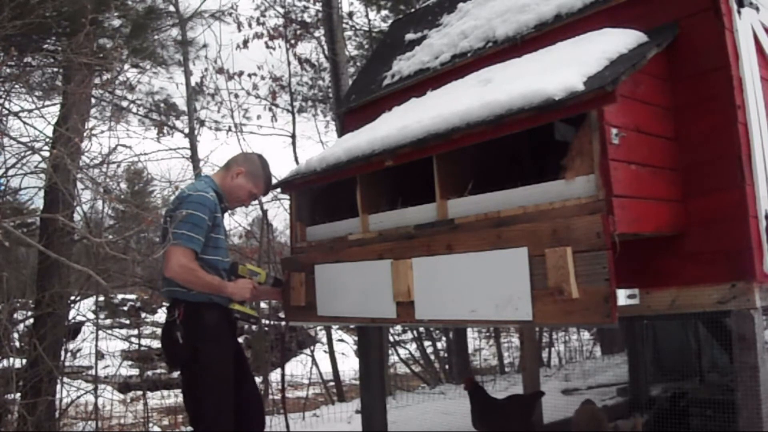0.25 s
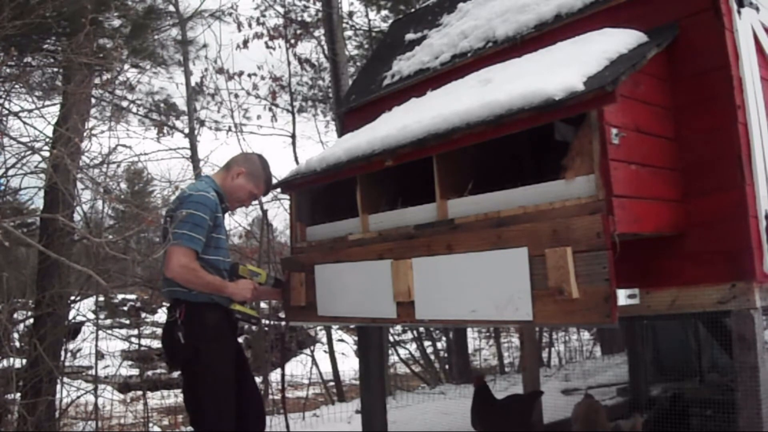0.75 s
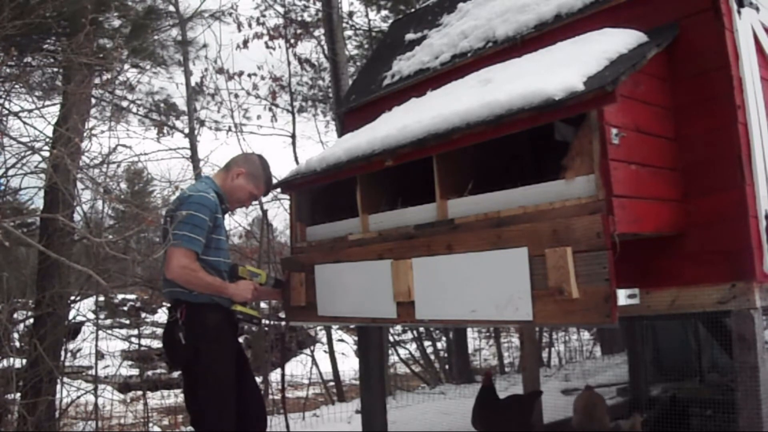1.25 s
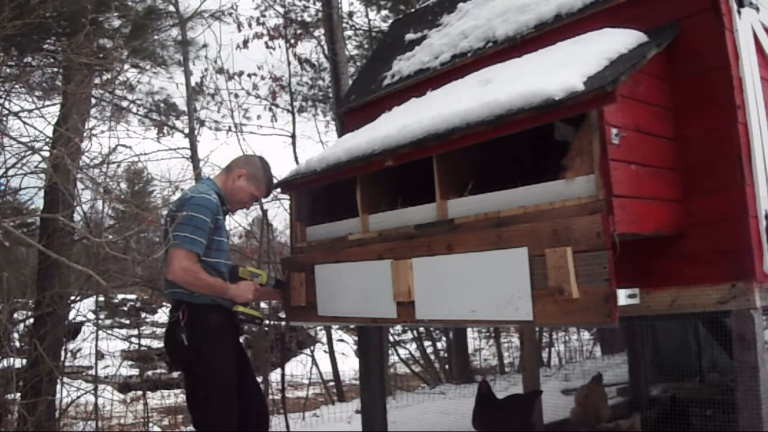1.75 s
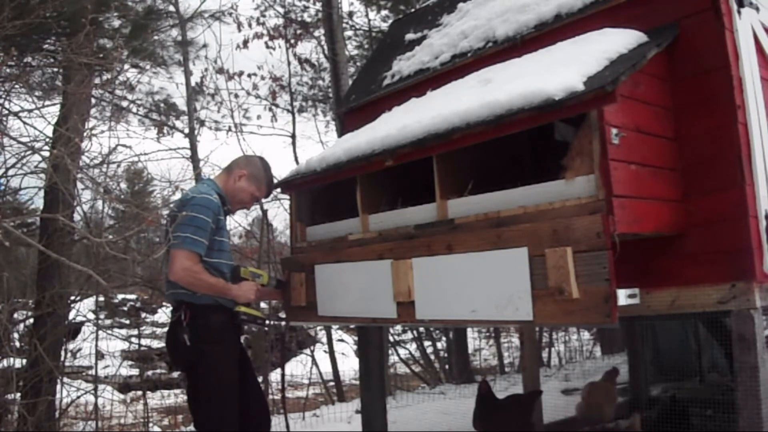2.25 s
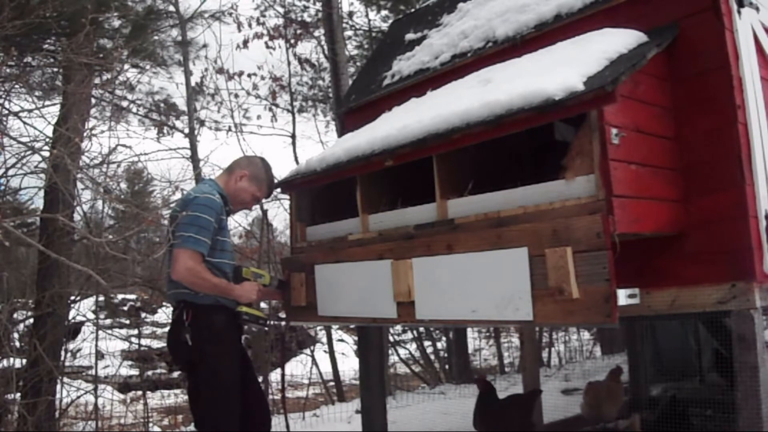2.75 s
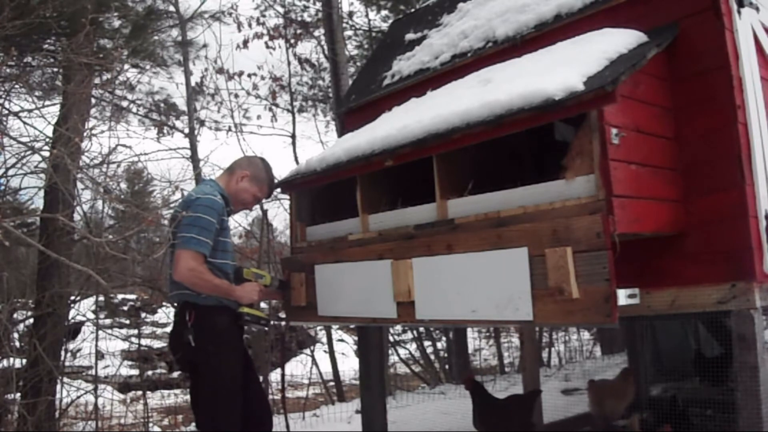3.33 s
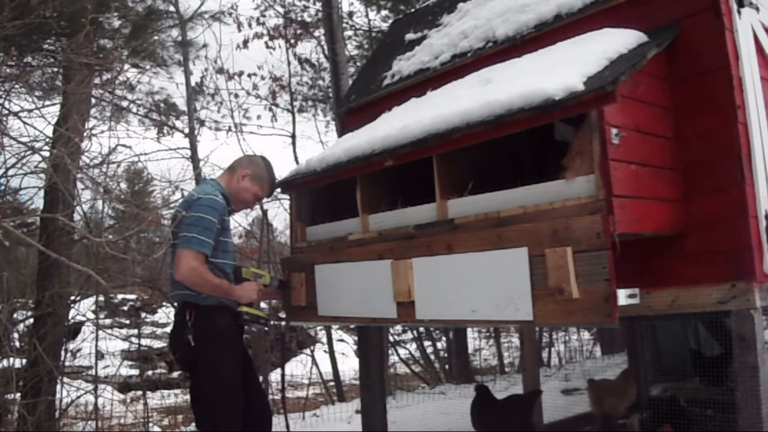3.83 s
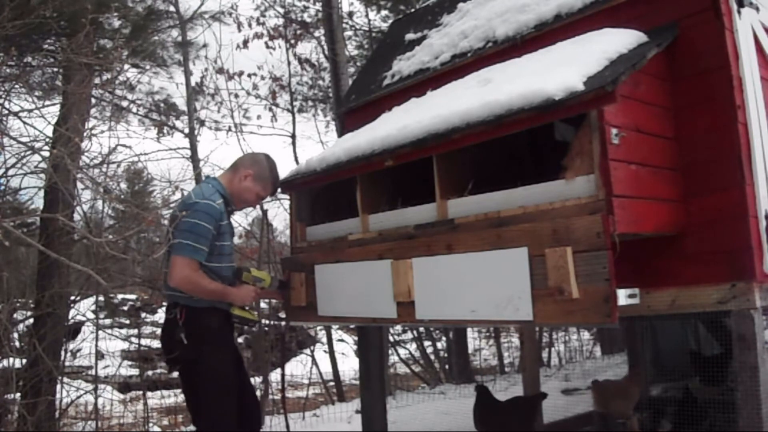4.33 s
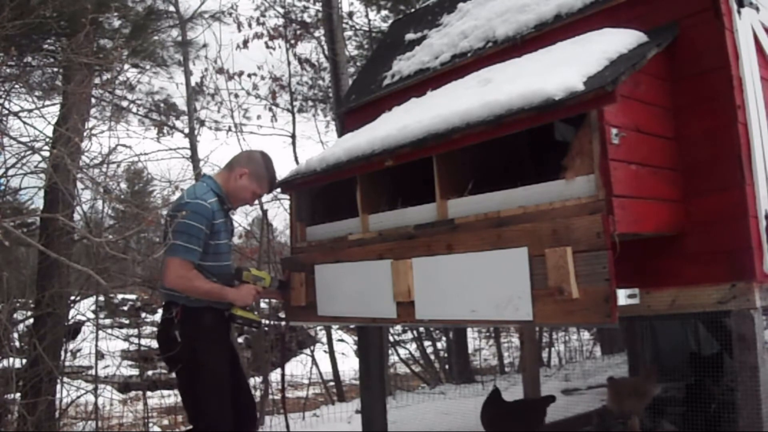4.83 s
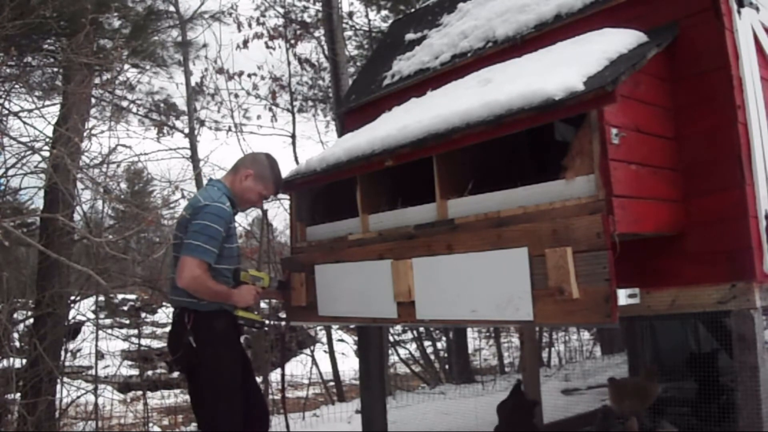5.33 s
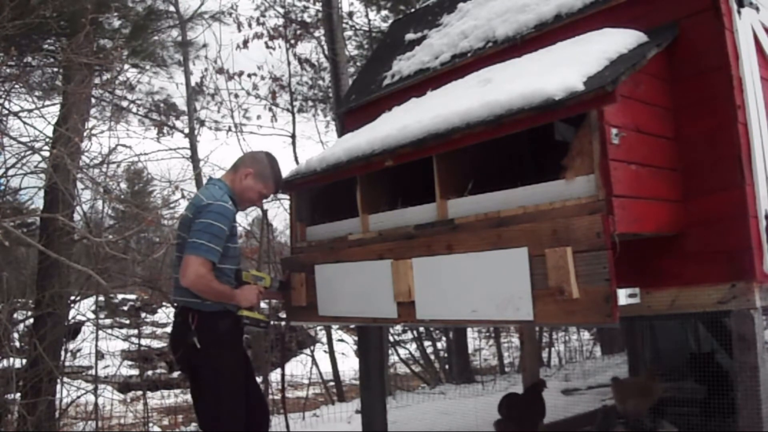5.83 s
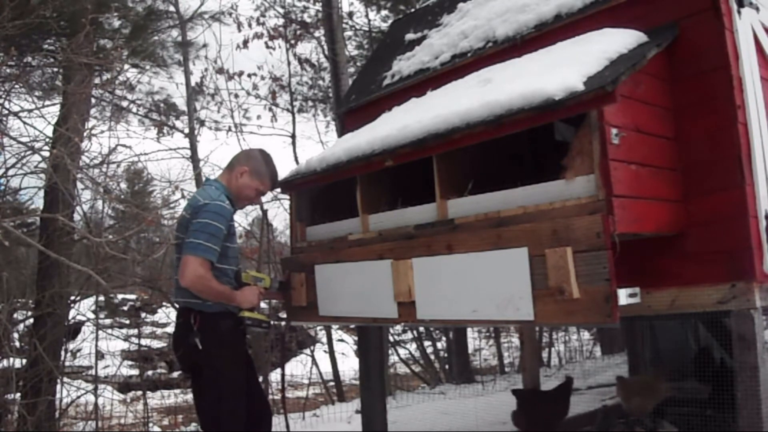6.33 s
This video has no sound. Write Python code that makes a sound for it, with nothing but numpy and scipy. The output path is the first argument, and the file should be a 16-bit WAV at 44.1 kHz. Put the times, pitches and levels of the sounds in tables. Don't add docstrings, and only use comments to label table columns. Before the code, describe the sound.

A cordless drill whirs in short rising squeezes, then a longer pull, with sharp clacks echoing off wooden boards in a quiet snowy yard.

```python
import sys
import numpy as np
from scipy import signal
from scipy.io import wavfile
from scipy.ndimage import uniform_filter1d

SR = 44100
rng = np.random.default_rng(int(sys.argv[2]) if len(sys.argv) > 2 else 0)


def gain_from_db(level_db):
    decades = np.asarray(level_db, float) / 20
    return 10 ** decades


def master(y):
    cut = np.clip(np.atleast_2d(y).T, -1, 1)
    pcm = np.round(cut * 32767)
    wavfile.write(sys.argv[1], SR, pcm.astype(np.int16))


N = 289516

# f/Hz, width/Hz, level/dB
HOUSING = [(1845, 250, -14.5), (2310, 197, -6.5), (2765, 252, 0), (3014, 536, -4), (3045, 240, -6),
           (3903, 550, -7), (4172, 380, -8), (4530, 720, -10), (5300, 330, -11), (5820, 245, -17.5)]
# f/Hz, width/Hz, level/dB
FIZZ = [(6820, 420, -2.5), (7270, 3600, 2.5), (8790, 230, -15.5), (9850, 2240, 6.5), (10700, 1300, -8),
        (11900, 1100, 2), (13400, 420, -29)]
# f/Hz, width/Hz, level/dB
BOARDS = [(384, 480, -9), (798, 147, 1.5), (1180, 310, -3), (1716, 260, -1), (2020, 500, -1)]
LOCK_HZ = 2735


def evened(x):
    return x / np.sqrt(np.mean(x ** 2) + 1e-20)


def add(mix, s, sound):
    part = mix[round(s * SR):][:len(sound)]
    part += sound[:len(part)]


def causal(gain):
    log_gain = np.log(np.concatenate([gain, gain[-2:0:-1]]) + 1e-5)
    taps = np.fft.ifft(np.exp(np.conj(signal.hilbert(log_gain)))).real[:1024]
    return taps / np.linalg.norm(taps)


def passed_power(hz, modes):
    return sum((gain_from_db(db) / (1 + (2 * (hz - f) / w) ** 2)) ** 2 for f, w, db in modes)


def passed_db(hz, modes):
    return 10 * np.log10(passed_power(hz, modes))


def through(x, modes):
    hz = np.fft.rfftfreq(4096, 1 / SR)
    taps = causal(np.sqrt(passed_power(hz, modes)))
    return signal.oaconvolve(x, taps)[:len(x)]


def flutter(length):
    return evened(uniform_filter1d(rng.standard_normal(length), size=500))


def yard():
    # f/Hz, level/dB per Hz
    air_spectrum = [(12, -38), (20, 18.5), (53, -5), (150, -3.5), (193, -3.5), (434, -7.5), (574, -8.5),
                    (1530, -14.5), (1960, -15.5), (2820, -14.5), (7110, -22), (10500, -18.5),
                    (11400, -17.5), (12400, -22), (16000, -29)]
    # t/s, level/dB
    rumble_swell = [(0.0, 1.5), (6.56, -2)]
    frames, hz = N // 256 + 5, np.fft.rfftfreq(1024, 1 / SR)
    real, imag, patches = rng.standard_normal((frames, 513, 3)).T
    patches = evened(uniform_filter1d(uniform_filter1d(patches, 12, 0), 14, 1))
    f, db = np.transpose(air_spectrum)
    air_db = np.interp(np.log(hz + 1), np.log(f + 1), db)[:, None]
    swell_db = np.interp(np.arange(frames) * 256 / SR, *np.transpose(rumble_swell))
    swell_db = swell_db / (1 + (hz[:, None] / 1500) ** 2)
    z = (real + 1j * imag) * gain_from_db(air_db + 1.36 * patches + swell_db)
    return gain_from_db(-45) * evened(signal.istft(z, nperseg=1024, noverlap=768)[1][:N])


def camera():
    # f/Hz, width/Hz, level/dB
    servo_case = [(3700, 720, 2.5), (4920, 220, 3.5), (7220, 310, 3), (9230, 640, 0.5), (12400, 720, -1)]
    # f/Hz, width/Hz, level/dB
    hiss_bands = [(7870, 270, -59.5), (2730, 190, -93), (15200, 3600, -68)]
    scan_levels = [-26, -15, 0, -17]
    servo_start, servo_length = 0.653, 0.393
    scan_hz, field_hz, steps_per_s = 15734, 60, 58.1
    t = np.arange(N) / SR
    on = 1. * ((t - servo_start) % 1 < servo_length) * (t > servo_start)
    on = uniform_filter1d(on, 800)
    puffs = 0.32 + np.exp(-(t * steps_per_s % 1) / 0.26)
    out = gain_from_db(-47) * on * puffs * through(rng.standard_normal(N), servo_case)
    for hz, width, db in hiss_bands:
        out += gain_from_db(db) * through(rng.standard_normal(N), [(hz, width, 0)])
    for k, db in enumerate(scan_levels):
        out += gain_from_db(db - 57) * np.sin(2 * np.pi * (scan_hz + field_hz * (k - 2)) * t)
    return out


def whine():
    # t/s, level/dB
    whine_levels = [(0.0, -47), (0.55, -46.5), (0.69, -62), (0.8, -44), (1.24, -52.5), (2.56, -54),
                    (2.92, -53), (3.34, -53), (3.69, -48.5), (4.07, -68), (4.25, -48), (4.66, -55),
                    (4.82, -46), (5.11, -61), (5.44, -50), (5.68, -57), (6.12, -64), (6.56, -53)]
    t = np.arange(N) / SR
    gain = gain_from_db(np.interp(t, *np.transpose(whine_levels)))
    return gain * np.sqrt(2) * np.sin(2 * np.pi * 11719 * t)


def whistle(s, length, db, hz, end_hz):
    u = np.linspace(0, 1, round(length * SR))
    tone = np.sin(2 * np.pi * np.cumsum(hz + (end_hz - hz) * u) / SR)
    return s, gain_from_db(db) * np.sqrt(2) * tone * np.sin(np.pi * u) ** 0.89


def clacks():
    # t/s, peak level/dB, board thump/dB, bright crack/dB, contact time/s
    clack_list = [(2.3894, -7.5, -46, 3.5, 0.0012), (3.2945, -38.5, -18, 4, 0.0057),
                  (3.89, -34, -21, -18, 0.0046), (4.118, -50, -18, 15.5, 0.0033),
                  (4.4904, -31.5, -18, -14, 0.00285), (5.245, -24, -31, -5, 0.002),
                  (5.25, -23, -26, -7, .002), (5.27, -28, -23, -19, 0.0026),
                  (5.2756, -6.5, -19.5, -10, 0.00098), (5.5918, -5.5, -7, -27, 0.0032),
                  (5.5956, -4, -8.5, -6.5, 0.0019), (5.6262, -12.5, -20, 3, 0.00043),
                  (6.2118, -22, -11.5, -26, 0.0024), (6.3875, -5, -7.5, -10, 0.0037),
                  (6.3905, -6.5, -8.5, -2.5, 0.0024), (6.5135, -41, -6, 9, 0.0023)]
    clack_t60, echo_db, echo_t60 = 0.0029, -9.5, 0.11
    t, out = np.arange(6000) / SR, np.zeros(N)
    for s, db, thump_db, crack_db, contact in clack_list:
        shape = np.clip(t / (.5 * contact), 0, 1)
        shape = shape * gain_from_db(-60 * np.maximum(t - contact, 0) / clack_t60)
        shape = shape + gain_from_db(echo_db - 60 * t / echo_t60) * (t > contact)
        rings = [through(shape * rng.standard_normal(len(t)), modes) for modes in (HOUSING, BOARDS, FIZZ)]
        knock, thump, crack = [ring / abs(ring).max() for ring in rings]
        add(out, s, gain_from_db(db) * (knock + gain_from_db(thump_db) * thump + gain_from_db(crack_db) * crack))
    return out


def motor_hz(t, squeeze, release, top_hz, coast):
    stall_hz, spin_up_s, crawl_hz = 600, .064, 330
    spin = top_hz - (top_hz - stall_hz) * np.exp(-(np.minimum(t, release) - squeeze) / spin_up_s)
    spin = np.maximum(spin - coast * np.maximum(t - release, 0), 0)
    return uniform_filter1d(np.hypot(spin, crawl_hz), size=700)


def motor_tones(t, hz, release, grip_db, bite_db):
    # f/Hz, width/Hz, level/dB
    gear_case = [(2765, 330, 0), (2370, 320, -9)]
    # f/Hz, width/Hz, level/dB
    vents = [(3800, 1600, 0)]
    tone_levels = [-30, -27, -35.5]
    speed_slopes = [32, 26, 0]
    speed = np.log10(hz / LOCK_HZ)
    tone_hz = np.minimum(hz, LOCK_HZ), 1.073 * hz, 2 * hz
    rings, bites = (gear_case, gear_case, vents), (bite_db, 0, bite_db)
    tone_db = [db + passed_db(f, modes) + slope * speed + grip_db + bite
               for db, f, modes, slope, bite in zip(tone_levels, tone_hz, rings, speed_slopes, bites)]
    coasting_db = -30 + 1.6 * passed_db(2 * hz, HOUSING) + grip_db + bite_db
    tone_db[2] = uniform_filter1d(np.where(t > release, coasting_db, tone_db[2]), size=700)
    lost_hz = np.maximum.accumulate(hz) - hz
    tone_db[:2] = [db - .008 * lost_hz for db in tone_db[:2]]
    out = np.zeros(len(t))
    for f, db in zip(tone_hz, tone_db):
        phase = 2 * np.pi * np.cumsum(f) / SR + .4 * flutter(len(t))
        out += gain_from_db(db + .5 + 2.8 * flutter(len(t))) * np.sqrt(2) * np.cos(phase)
    return out


def gear_overtones(phase):
    multiples = [3, 3.22, 4, 4.44, 5, 6, 7]
    strengths = [-3, -13, -2, -9, -3, -5, -7]
    out = np.zeros(len(phase))
    for k, db in zip(multiples, strengths):
        gain = gain_from_db(-13.5 + db + 2.5 * flutter(len(phase)))
        out += gain * np.cos(k * phase + .45 * flutter(len(phase)))
    return out


def tooth_rattle(t, hz, start, kick, jolt):
    phase = 2 * np.pi * np.cumsum(hz) / SR
    overtones = gear_overtones(phase)
    beat = 1 + 0.05 * np.cos(phase / 10)
    rattle = beat * gain_from_db(1.1 * flutter(len(t))) * rng.standard_normal((3, len(t)))
    slow_db = 5 * np.clip((1050 - hz) / 150, -1, np.sign(t - start - .2))
    low = through(rattle[0] + gain_from_db(slow_db - 6) * through(overtones, HOUSING), HOUSING)
    high = through(rattle[1] + gain_from_db(-4) * np.clip(hz / 2700, 0, 1) ** 4 * overtones, FIZZ)
    boards = (gain_from_db(-26) + gain_from_db(-5.5) * jolt) * through(rattle[2], BOARDS)
    return (kick + jolt) * low + gain_from_db(-6) * (1 + 0.36 * jolt) * high + boards


def spurt(pull, load):
    # t/s, jolt level/dB, drop of rattle/dB, drop of tones/dB
    slips = [
        (2.392, -35, -5, -4),
        (5.592, -17, -6, -20),
        (6.386, -23.5, -3, -24),
    ]
    attack_s, attack_db, kick_s, regrip_s = .022, -11, .045, 0.3
    stop_db_per_s, jolt_db_per_s, speed_db = 422, 328, 24
    start, release = pull[:2]
    stop, rattle_db, kick_db, bite_db = load
    t = np.arange(start, stop + .12, 1 / SR)
    hz = motor_hz(t, *pull)
    gate_db = attack_db * np.clip(1 - (t - start) / attack_s, 0, 1)
    gate_db = gate_db - stop_db_per_s * np.maximum(t - stop, 0)
    level_db = rattle_db + speed_db * np.log10(hz / LOCK_HZ) + gate_db
    for s, _, rattle_drop_db, _ in slips:
        level_db = level_db + rattle_drop_db * (t > s) * np.exp(-abs(t - s) / regrip_s)
    kick = gain_from_db(kick_db * np.exp(-(t - start) / kick_s))
    jolt = sum((t > s) * gain_from_db(db - jolt_db_per_s * abs(t - s) - level_db) for s, db, *_ in slips)
    grip_db = 2 * gate_db + 40 * np.log10(np.minimum(kick, 1))
    grip_db = grip_db + sum((t > s) * (s > start) * drop_db for s, *_, drop_db in slips)
    tones = motor_tones(t, hz, release, grip_db, bite_db)
    rattle = gain_from_db(level_db - 4.5) * tooth_rattle(t, hz, start, kick, jolt)
    return start, (rattle + tones) * signal.windows.tukey(len(t), .06)


def scene():
    # t/s, length/s, level/dB, start f/Hz, end f/Hz
    whistles = [(0.069, 0.053, -50, 5310, 5260), (0.419, 0.044, -43.5, 5330, 5000),
                (0.73, 0.031, -42.5, 5330, 5050), (1.049, 0.029, -43, 5330, 5000),
                (1.341, 0.031, -42, 5330, 5000), (1.712, 0.031, -41.5, 5300, 4960),
                (2.129, 0.036, -43.5, 5300, 4970), (6.19, 0.022, -53, 5300, 5520)]
    # squeeze t/s, release t/s, motor tone headed for f/Hz, coasting loss/Hz per s
    pulls = [(.09, .2, 3150, 4600), (.44, .555, 3140, 3000), (.745, .89, 3040, 6000),
             (1.065, 1.21, 2980, 7000), (1.35, 1.54, 2860, 6500), (1.73, 1.93, 2800, 6800),
             (2.145, 2.8, 2765, 6400), (5.232, 5.42, 2900, 1250), (6.195, 6.33, 2380, 400)]
    # stop t/s, rattle/dB, starting kick/dB, bite of motor tones/dB
    loads = [(.255, -27, -4, -18), (.598, -26, 1.5, -20), (.94, -25, 1.5, -18), (1.268, -24.5, 3, -11),
             (1.595, -23.5, 3, -2.5), (2.04, -23, 7.5, 0.5), (3.2, -23.5, 11, 0.5),
             (5.665, -24.5, -20, 0.5), (6.345, -23, 5, 5.5)]
    mix = yard() + camera() + clacks()
    for row in whistles:
        add(mix, *whistle(*row))
    for pull, load in zip(pulls, loads):
        add(mix, *spurt(pull, load))
    return np.array([mix, mix])


def band_limit(x):
    return signal.sosfilt(signal.butter(12, 17030, fs=SR, output="sos"), x)


def record(dry):
    peak_db = 20 * np.log10(uniform_filter1d(abs(dry[0]), size=8) + 1e-6)
    fall = np.arange(N) * 6.1 / SR
    over_db = np.maximum(np.maximum.accumulate(peak_db + fall) - fall + 10.0, 0)
    late_db = np.concatenate([np.zeros(300), uniform_filter1d(over_db, size=300)])[:N]
    x = np.clip(dry / gain_from_db(1.66 * late_db) + whine(), -1, 1)
    edge = signal.firwin(1023, 15900, window=("kaiser", 10), fs=SR)
    return band_limit(signal.oaconvolve(x, edge[None], "same"))


dry = scene()
out = record(dry)
master(out)
```